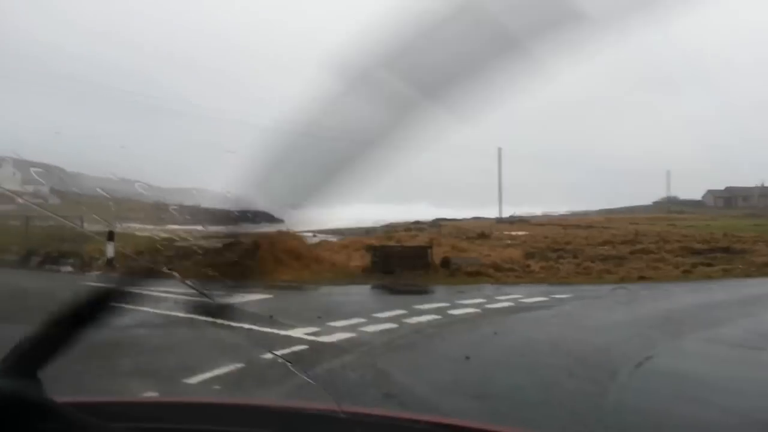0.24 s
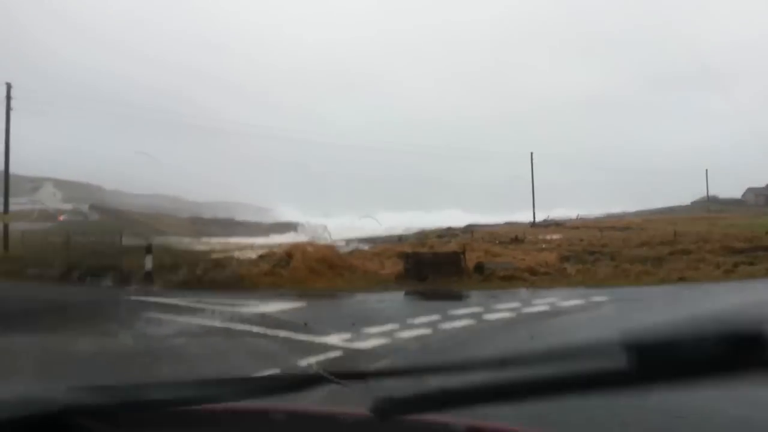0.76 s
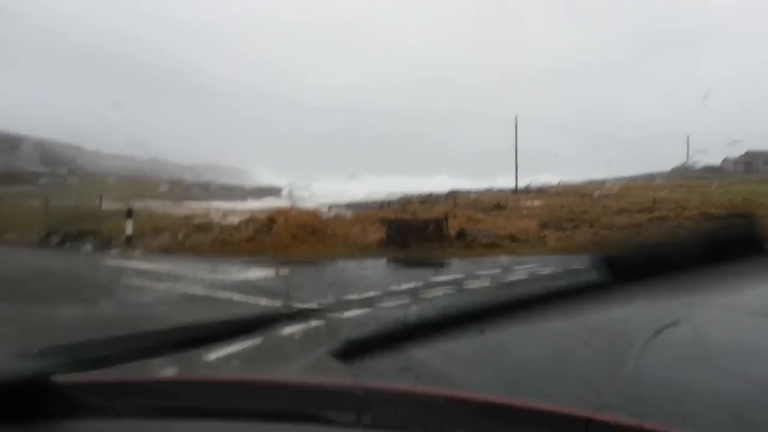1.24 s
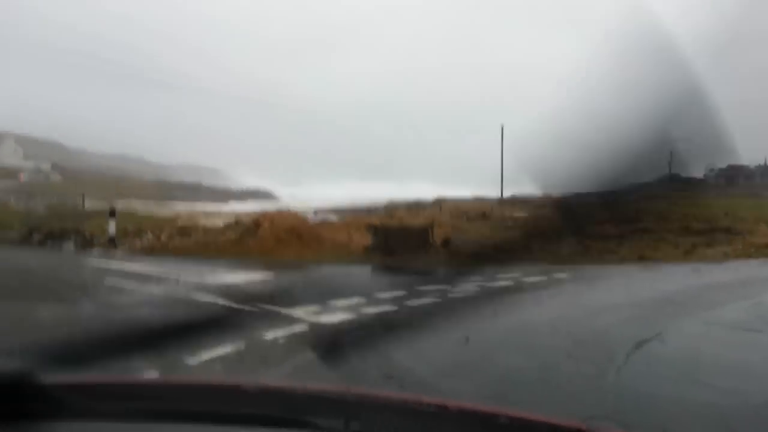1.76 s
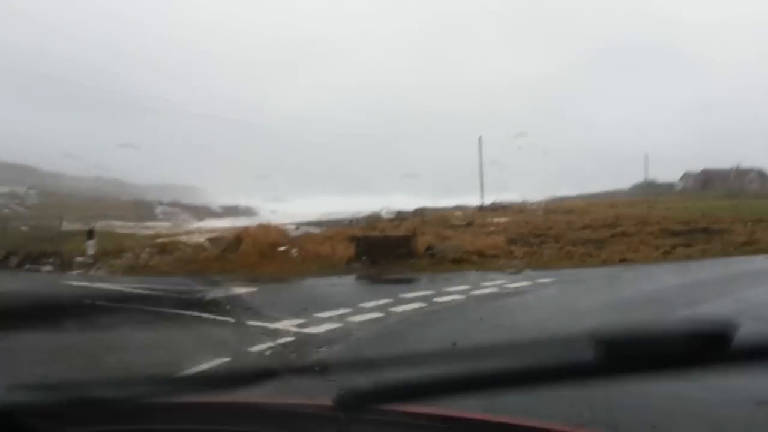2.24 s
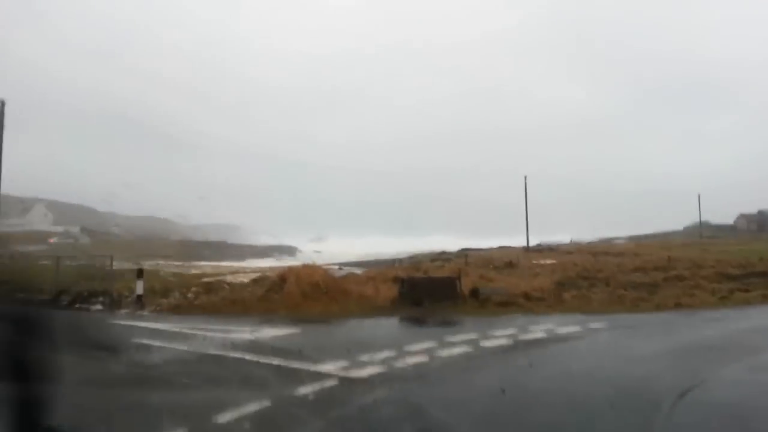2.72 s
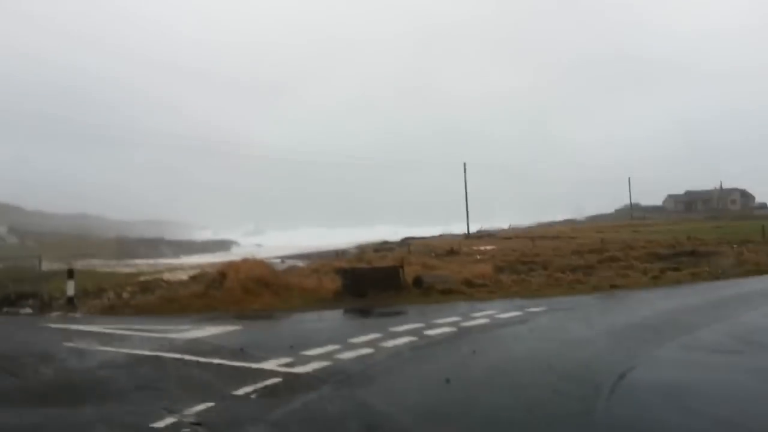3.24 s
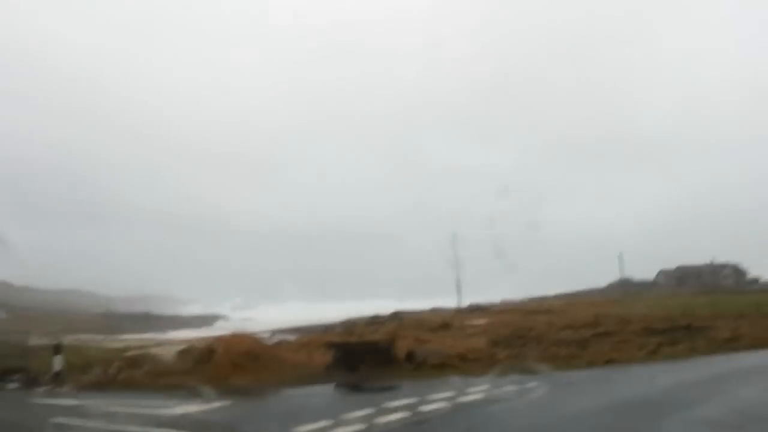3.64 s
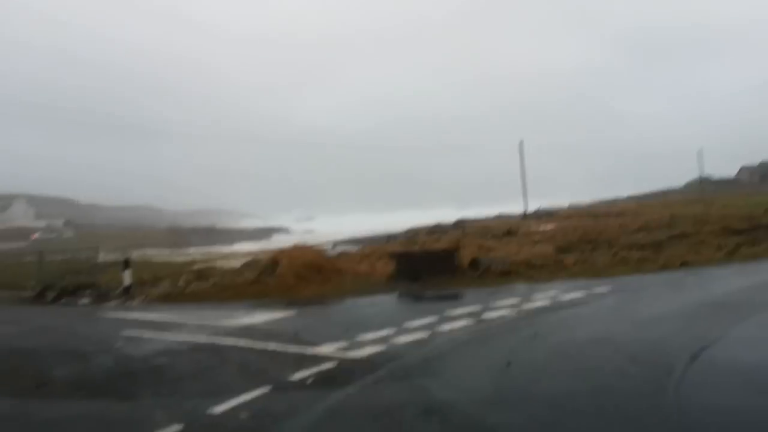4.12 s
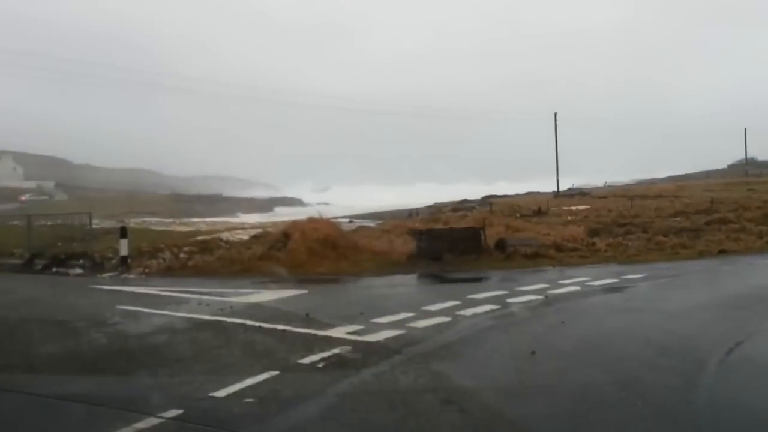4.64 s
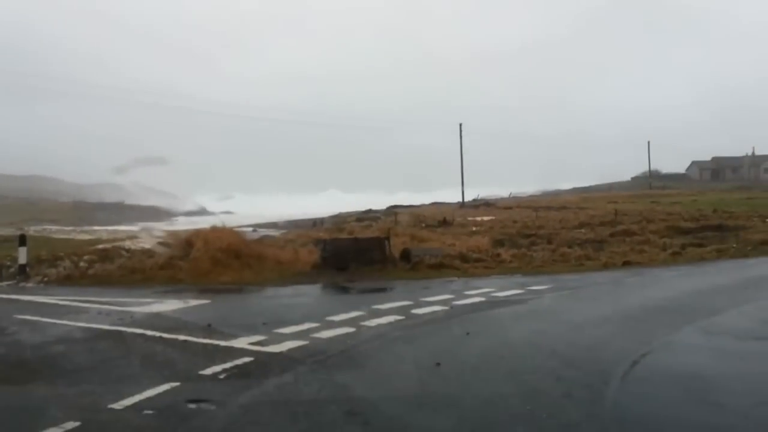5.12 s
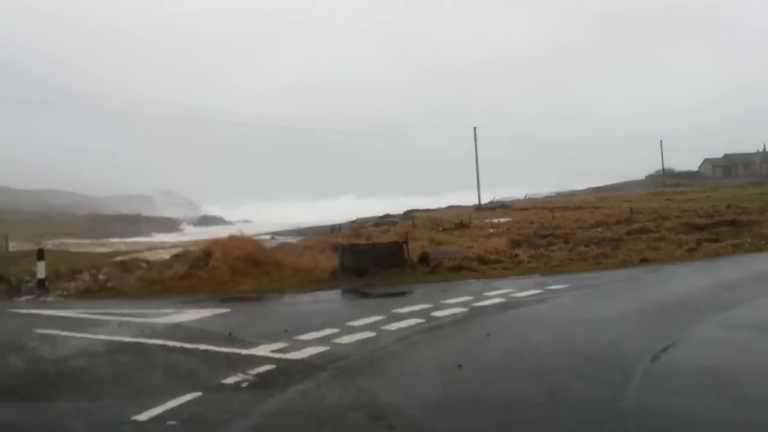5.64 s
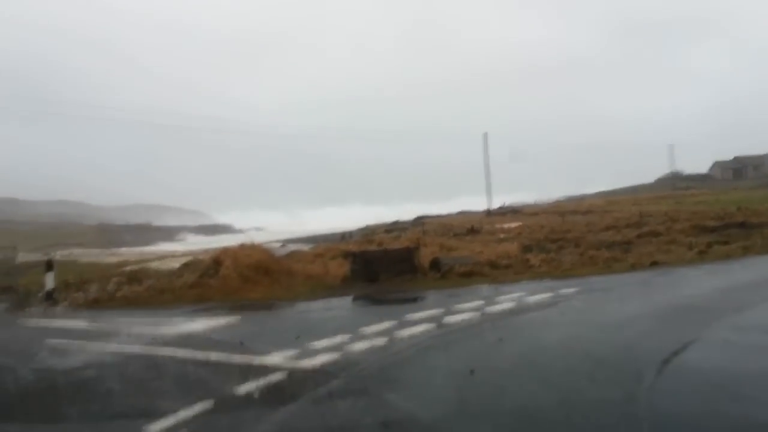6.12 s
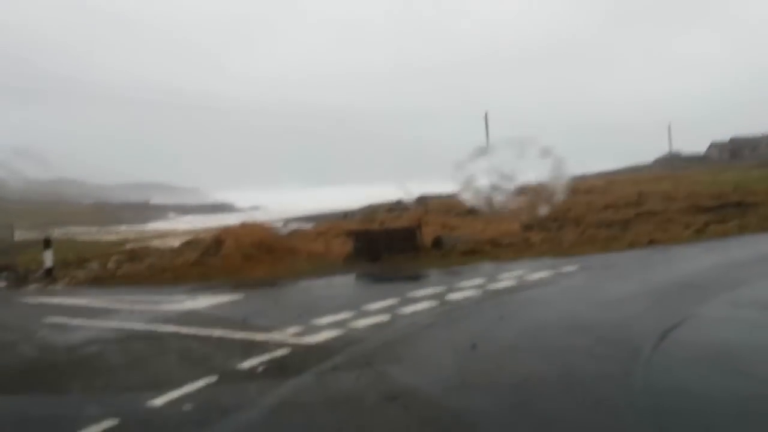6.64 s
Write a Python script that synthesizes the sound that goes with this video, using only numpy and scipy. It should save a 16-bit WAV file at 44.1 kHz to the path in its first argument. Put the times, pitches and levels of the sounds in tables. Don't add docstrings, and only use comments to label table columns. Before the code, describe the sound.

Stereo microphone in a car cabin near the glass: after brief silence, rain rattles quickly over a steady muffled gale, with one hard drop snapping on the right. The wind grows, then a draught buffets the right channel with rapid low puffs and overloaded knocks, while the left stays mostly boom and rain. Treble is slightly ragged and thinned.

```python
import sys
import numpy as np
from scipy import signal
from scipy.io import wavfile
from scipy.ndimage import uniform_filter1d

SR = 44100
rng = np.random.default_rng(int(sys.argv[2]) if len(sys.argv) > 2 else 0)


def boost(x):
    u = np.asarray(x, float) / 20
    return 10 ** u


def pcm_store(signal):
    levels = np.round(np.clip(np.atleast_2d(signal), -1, 1) * 32767)
    wavfile.write(sys.argv[1], SR, levels.astype(np.int16).T)


N = 302967
CALM_DB = -24.0

# time_s, level_db
GALE = [(0.25, -24.5), (0.7, -24), (1.6, -23), (2.2, -22.5), (2.7, -20.5), (3.6, -20), (4.3, -20.5),
        (5.1, -21), (5.7, -20), (6.0, -20.5), (6.4, -19.5), (6.87, -21)]
# peak_s, rain_swell_db, boom_swell_db, thinning_s
GUSTS = [(0.34, 1.5, 1.5, 0.47), (0.5, 2, 0.5, 0.16), (0.66, 5.5, 2.5, 0.093), (0.994, 8, 4.5, 0.058),
         (1.13, 3, 0, 0.15), (1.35, 4, 6.5, 0.11), (1.72, 6, 3, 0.052), (2.011, 5, 4.5, 0.27),
         (2.34, 3.5, 4.5, 0.081), (2.49, 0, 0, 0.052), (2.65, 6.5, 2, 0.2), (2.85, 4, 1.5, 0.33),
         (3.05, 1.5, 1.5, 0.17), (3.22, 1, 1.5, 0.047), (3.38, 2, 1, 0.088), (3.62, 1.5, -1.5, 0.3),
         (3.691, 5.5, -2.5, 0.094), (3.74, 2.5, 1.5, 0.094), (3.785, 1, 3, 0.041), (3.9, 3.5, -0.5, 0.27),
         (4.13, 2.5, 3, 0.2), (4.45, 4, 3, 0.33), (4.722, 2.5, 2.5, 0.028), (4.88, 4.5, -1, 0.28),
         (5.08, 4, -1, 0.053), (5.17, 3.5, 5, 0.17), (5.648, 4, 2, 0.094), (5.81, 5.5, 0, 0.016),
         (6.081, 3.5, -1.5, 0.069), (6.2, 3, 1.5, 0.56), (6.51, 3, 0, 0.075), (6.74, 2, 5.5, 0.1)]
# freq_hz, level_db (per Hz)
BOOM_COLOUR = [(15, -77), (25, -64), (54, -25), (135, -6.5), (211, 0.5), (358, -4), (389, -4.5), (437, -3),
               (559, -4), (628, -7), (1300, -13.5), (1690, -66), (2860, -120)]
# pitch_hz, width_hz, level_db (over the broad boom)
CABIN_RESONANCES = [(297, 31, -1), (345, 32, -5.5), (453, 48, -7.5), (632, 22, 2.5), (689, 36, -5),
                    (857, 170, -6.5), (1143, 29, 0), (1460, 78, 1.5)]
# freq_hz, level_db (per Hz)
PATTER_COLOUR = [(590, -12.5), (1000, -6.5), (1160, -5), (1270, -7), (1460, 17.5), (1810, -5), (2390, 6.5),
                 (2790, 1), (4300, -2.5), (5500, -14.5), (7150, -74), (12100, -120)]
# freq_hz, level_db (per Hz)
SPRAY_COLOUR = [(4500, 16), (5500, 4), (7000, 11.5), (9000, 4), (11000, 2), (13000, 3), (15500, -18.5)]
# freq_hz, likeness (-1 opposed, 0 unrelated, 1 same)
LIKENESS = [(60, 0.94), (110, 0.93), (200, 0.98), (380, 0.57), (700, 0.67), (1290, -0.71), (2380, 0.16),
            (4400, -0.056), (8120, 0.036), (15000, 0.031)]
# start_s, peak_db, pitch_hz, port (0 left, 1 right)
GLASS_SNAPS = [
    (.6386, .3, 4200, 1),
    (1.3858, -11, 4500, 1),
    (2.6565, -11, 5500, 0),
]
# start_s, peak_db, pitch_hz, left_minus_right_db, splash_db
BIG_DROPS = [(0.6497, -22, 2550, -5, 23.5), (0.9562, -18, 2320, -3, -2), (0.9867, -21, 2430, 0, 11),
             (1.4097, -19.5, 4440, 1, 12), (1.719, -22, 2950, 1, 5), (1.914, -19, 2400, -2, 8),
             (2.01, -15, 2500, 11, -10), (2.2245, -26.5, 2540, 11, 17), (2.4882, -16, 2580, -5, -14),
             (2.5925, -25, 2200, 3, 17), (2.656, -14, 2550, 1, 12), (2.7043, -25, 2570, 20, 4),
             (2.745, -17.5, 3000, -2, 11.5), (3.0, -14.5, 3000, -2, 6), (3.056, -11, 2310, 0, -4),
             (3.157, -14, 2660, -2, 8), (3.795, -19, 2600, 2, 15), (3.3812, -16, 2420, -4, -10),
             (3.8826, -17, 2780, 1, -10), (3.918, -24, 2440, -3, 7), (4.113, -10, 2420, -2.5, 0),
             (4.4402, -22, 2510, -22, -8), (4.7311, -14, 2520, 3, 8), (4.878, -17, 2830, 3, 5),
             (4.9052, -17, 2760, 2, 3), (5.162, -8.5, 2520, -6, -21), (5.3668, -17, 2670, -6, -15),
             (6.2133, -10, 2310, -2.0, -23.5), (6.5081, -15, 2720, -5, -11)]
# time_s, level_db
DRAUGHT = [(2.3, -32), (2.6, -10), (3.1, -14.5), (3.5, -12.5), (3.72, -12), (4.05, -19.5), (4.26, -5.5),
           (4.37, -24), (4.46, -9.5), (4.72, -14), (4.95, -9.5), (5.25, -13.5), (5.5, -11.5), (5.7, -16),
           (5.88, -12.5), (6.03, -16.5), (6.25, -14.5), (6.8, -14)]
# freq_hz, level_db (per Hz)
DRAUGHT_COLOUR = [(25, -67), (60, -29), (120, -7), (220, -3.5), (350, -10.5), (600, -9), (900, -48),
                  (1500, -17.5)]
# centre_s, level_db, length_s, pitch_hz
PUFFS = [(2.726, -7, 0.011, 374), (2.797, 3.5, 0.0088, 374), (2.959, 0, 0.009, 327),
         (3.063, -4, 0.011, 318), (3.296, -0.5, 0.019, 286), (3.324, -2, 0.012, 390),
         (3.478, 0.5, 0.012, 420), (3.835, -4, 0.0098, 426), (3.884, -4.5, 0.028, 404),
         (4.011, -4.5, 0.035, 370), (4.089, -9, 0.024, 455), (4.186, -1, 0.0054, 487),
         (4.517, -4.5, 0.016, 405), (4.585, -9, 0.015, 298), (4.843, -7, 0.033, 370),
         (4.95, -6, 0.029, 326), (5.249, -5.5, 0.038, 280), (5.275, -8, 0.0099, 350),
         (5.416, -7.5, 0.014, 297), (4.071, -6, 0.016, 397), (5.812, 0.5, 0.011, 540),
         (5.801, -7.5, 0.011, 600), (5.897, -4, 0.0094, 300), (6.239, -5, 0.0057, 328),
         (3.296, -6.5, 0.0043, 510), (6.131, 4.5, 0.016, 289), (6.141, 3, 0.0065, 426),
         (6.419, -3.5, 0.018, 380), (6.459, -5, 0.013, 350)]
# swing_back_s, peak_db, pitch_hz
KNOCKS = [(2.6881, -1.2, 270), (2.742, 2, 318), (2.7847, 3, 326), (2.8158, -3, 242), (2.9425, 1, 264),
          (3.0145, 1, 270), (3.1475, -1, 292), (3.1618, -4, 325), (3.2056, -5, 264), (3.335, -6, 320),
          (3.4043, -2, 267), (3.4448, -1.5, 320), (3.4972, 4, 240), (3.5202, -1, 242), (3.5472, 3, 322),
          (3.5808, 1.5, 427), (3.5972, -2, 294), (3.6118, 0.5, 242), (3.623, 1.5, 288), (3.6368, -1, 270),
          (3.7953, -2.5, 198), (3.8602, -10, 222), (3.967, -9, 200), (4.0428, 1, 290), (4.169, -15, 242),
          (4.2262, -3, 414), (4.2545, -4, 202), (4.2724, 0, 476), (4.429, -3, 267), (4.4607, -1, 390),
          (4.546, -5.4, 356), (4.6147, -4, 320), (4.8624, -6, 243), (4.9221, -2, 294), (4.9818, -2.5, 220),
          (5.1145, -1, 390), (5.131, -2, 382), (5.192, -2.5, 198), (5.2035, 0, 240), (5.2252, -5, 202),
          (5.395, -2, 194), (5.4314, -1, 380), (5.4695, 3, 545), (5.4813, -0.5, 537), (5.5067, 0, 244),
          (5.5307, 4, 297), (5.548, -3, 240), (5.5624, -1, 300), (5.8291, 2.5, 360), (5.8921, -9, 265),
          (5.907, 0, 318), (5.934, 5.5, 312), (6.149, -5, 296), (6.2332, -2.5, 294), (6.2509, -2, 267),
          (6.3705, -2, 298), (6.3976, -6, 200), (6.6512, 0, 242), (6.7191, 0.5, 286), (6.7475, -5, 392)]
# swing_back_s, peak_db, pitch_hz
MORE_KNOCKS = [(2.826, -4, 380), (2.973, -5, 380), (2.995, -6, 360), (3.191, -7, 325), (3.323, -6, 410),
               (3.487, 0, 420), (3.513, -6, 300), (3.731, -7.5, 540), (4.068, -1, 410), (4.089, -7, 480),
               (4.098, -7, 490), (4.183, 2, 520), (4.436, -11, 320), (4.516, 3, 406), (4.585, 3, 300),
               (4.6, -5, 340), (4.627, -2, 373), (4.643, -7, 375), (4.821, -2, 360), (4.844, 3, 414),
               (4.958, -3, 300), (4.965, -2, 490), (5.119, -5, 403), (5.186, -5, 405), (5.25, -3, 290),
               (5.27, -1, 337), (5.2775, -6, 453), (5.412, -2, 358), (5.455, -3, 370), (5.806, 5, 650),
               (5.821, -4, 560), (5.895, -9, 360), (5.915, -3, 400), (6.094, -2.5, 395), (6.139, 3, 600),
               (6.162, -8, 395), (6.26, -5, 295), (6.457, 1, 380), (6.64, -6, 402), (6.775, -12, 358),
               (2.585, -2, 600), (3.29, 3, 523), (3.475, 6, 520), (3.544, -13, 600), (6.492, -4, 560),
               (6.705, -10, 560)]
# start_s, length_s, ceiling_lift_hz (dies away after)
OPEN_TREBLE = [(.33, 0, 900), (.38, 0, 1100), (.48, 0, 900), (1.06, 0, 700), (2.0, 0, 900), (2.08, 0, 1200),
               (2.28, 0, 1800), (2.4, 0, 900), (0.635, .05, 0), (1.38, .04, 500), (1.895, .035, 300),
               (2.58, .03, 2), (2.64, .04, 500), (2.775, .065, 2000), (3.265, .035, -2), (3.61, .07, 2000),
               (4.836, .06, 2000), (5.91, .02, 11), (6.345, .024, 0), (6.5, 0, 1198)]


def rms_one(x):
    return x / np.sqrt(np.mean(x ** 2) + 1e-20)


def in_time(rows):
    s, *columns = np.transpose(rows)
    return [np.interp(np.arange(N) / SR, s, c) for c in columns]


def at_hz(points, hz):
    freq_hz, value = np.transpose(points)
    return np.interp(np.log(hz), np.log(freq_hz), value)


def drift(rate):
    r = np.exp(-80 * np.pi * rate / SR)
    slow = signal.lfilter([1], [1, -2 * r, r * r], rng.standard_normal(N // 40 + 2002))[2000:]
    return np.interp(np.arange(N) / 40, np.arange(len(slow)), rms_one(slow - slow.mean()))


def band(x, low_hz, high_hz):
    return signal.sosfilt(signal.butter(2, [low_hz, high_hz], "band", fs=SR, output="sos"), x)


def white():
    return rng.standard_normal((2, 2, N))


def colour(source, spectrum, shared_db, own_db, rate):
    first, last = spectrum[0][0], spectrum[-1][0]
    edges = np.geomspace(first, last, round(3 * np.log2(last / first)) + 1)
    out, together = 0, drift(rate)
    for k, (low, high) in enumerate(zip(edges, edges[1:])):
        hz = np.sqrt(low * high)
        band_db = at_hz(spectrum, hz)
        if band_db < -62:
            continue
        mid, side = band(source[k % 2], low, high)
        alike = np.clip(at_hz(LIKENESS, hz), -1, 1)
        gain = boost(band_db + shared_db * together + own_db * drift(rate))
        stereo = np.sqrt(1 + alike) * mid + np.sqrt(1 - alike) * side * [[1], [-1]]
        out = out + gain * stereo
    return rms_one(out)


def gale():
    return in_time(GALE)[0] - CALM_DB


def swells(times, sizes_db, rise_s, fall_s):
    t = np.arange(0, N + 64, 64) / SR
    late = t - np.array(times)[:, None]
    shape = np.exp(np.where(late < 0, late / rise_s, -late / fall_s))
    return np.interp(np.arange(N) / SR, t, np.array(sizes_db) @ shape)


def boom():
    s, _, size_db, _ = np.transpose(GUSTS)
    level_db = CALM_DB + gale() + swells(s, size_db, rise_s=0.04, fall_s=0.1)
    broad = colour(white(), BOOM_COLOUR, shared_db=-0.07, own_db=2.0, rate=26.7)
    ringing = 0
    for hz, width_hz, db in CABIN_RESONANCES:
        gain = boost(db + 3.3 * drift(1.65))
        ringing = ringing + gain * signal.lfilter(*signal.iirpeak(hz, hz / width_hz, SR), broad)
    return boost(level_db) * rms_one(broad + ringing)


def impacts(per_s, spread_db, wash):
    sizes = boost(spread_db * np.minimum(rng.exponential(1, (2, N)), 5)) * rng.choice([-1, 1], (2, N))
    landed = rng.random((2, N)) < per_s / SR
    return rms_one(sizes * landed) + wash * white()


def rain():
    s, size_db, _, thin_s = np.transpose(GUSTS)
    sheet_db = swells(s, size_db, rise_s=0.015, fall_s=thin_s[:, None])
    wind_db = np.maximum(gale(), 0)
    patter_db = -33 + 0.49 * wind_db + sheet_db
    spray_db = -16 - 0.19 * wind_db - 0.023 * sheet_db
    pan_db = -3.5 + 0.4 * wind_db
    drops = impacts(per_s=1500, spread_db=6.5, wash=4.5)
    patter = boost(3.0) * colour(drops, PATTER_COLOUR, shared_db=1.0, own_db=0.7, rate=53)
    patter = patter + 0.33 * band(patter, 4910, 5480)
    tick = 0.24 * np.clip(1 - wind_db / 3, -.5, 1) * band(patter, 3550, 7300)
    windscreen = 0.024 * sheet_db * band(patter, 2170, 3500)
    patter = patter + tick + windscreen
    spray = boost(spray_db + 4.5) * colour(drops, SPRAY_COLOUR, shared_db=-0.4, own_db=1.74, rate=58)
    return boost(patter_db) * (patter * boost(np.outer([.5, -.5], pan_db)) + spray)


def glass_snaps():
    out, t = np.zeros((2, N)), np.arange(64) / SR
    for s, peak_db, hz, port in GLASS_SNAPS:
        i = round(s * SR)
        snap = -np.cos(2 * np.pi * hz * t) * np.exp(-(t * hz / 1.5) ** 3)
        out[port, i:i + len(t)] += boost(peak_db) * snap
    return out


def big_drops():
    out, t = np.zeros((2, N)), np.arange(round(.12 * SR)) / SR
    noises = rng.standard_normal((len(BIG_DROPS), 2, len(t)))
    for (s, peak_db, hz, pan_db, splash_db), noise in zip(BIG_DROPS, noises):
        tick = np.sin(2 * np.pi * hz * t) * np.exp(-(t * hz / 2.0 - .8) ** 2)
        splash = rms_one(band(noise, 1940, 4800)) * np.exp(-t / 0.0079)
        drop = boost(-1.0) * tick + boost(splash_db - 18.5) * splash
        i = round(s * SR)
        out[:, i:i + len(t)] += boost(peak_db + np.array([[.5], [-.5]]) * pan_db) * drop
    return out


def knocks(rows):
    rise, fall = 0.3, 0.95
    snap = .55
    out, t = np.zeros(N + SR), np.arange(-400, 1200) / SR
    for (s, peak_db, hz), u in zip(rows, rng.uniform(-1.1, 1, (len(rows), 2))):
        turns = t * hz * np.where(t > .5 / hz, 1 + .12 * u[0], 1)
        decay = turns / (fall * (1 + 0.22 * u[1]))
        shape = np.exp(-np.where(t < 0, (turns / rise) ** 2, decay))
        phase = 2 * np.pi * turns
        swing = np.sin(phase + snap * np.sin(phase) * (np.abs(turns) < .5))
        i = round((s + t[0]) * SR)
        out[i:i + len(t)] -= boost(peak_db - 1.0) * swing * shape
    return out[:N]


def port_wind():
    level_db, = in_time([(DRAUGHT[0][0] - .4, -50)] + list(DRAUGHT))
    lumps = impacts(per_s=200, spread_db=3.5, wash=0.4)
    near = colour(lumps, DRAUGHT_COLOUR, shared_db=1.5, own_db=1.5, rate=25)[0]
    far = np.roll(near, N // 2)
    right = boost(level_db - 9.5) * near + knocks(KNOCKS)
    t = np.arange(-round(.06 * SR), round(.06 * SR)) / SR
    for (s, puff_db, length, hz), noise in zip(PUFFS, rng.standard_normal((len(PUFFS), len(t)))):
        swell = np.exp(-np.abs(2 * t / (np.where(t < 0, 1.25, .95) * length)) ** 3)
        eddy = band(band(noise ** 3, 0.58 * hz, 1.287 * hz), 88, 2.47 * hz)
        eddy = eddy / np.sqrt(uniform_filter1d(eddy ** 2, size=420) + 1e-9)
        crest = rms_one(band(band(noise, 600, 1700), 400, 2300))
        crest = crest * np.exp(-((t - 0.18 * length) / 0.0015) ** 2)
        eddy = eddy + boost(-12 + 0.49 * min(puff_db, 0)) * crest
        push = np.sign(noise[0]) * boost(-58 + 2.2 * puff_db)
        gain = boost(puff_db - 3.5 + 0.27 * max(puff_db + 0.5, 0))
        i = round((s + t[0]) * SR)
        right[i:i + len(t)] += (gain * swell * (eddy + push))[:N - i]
    return np.array([boost(level_db - 14.0) * far, right + knocks(MORE_KNOCKS)])


def scene():
    return boom() + rain() + big_drops() + glass_snaps() + port_wind()


def starve_treble(x, slope_hz, ragged_db, hz_per_db):
    hop, lead = 1024, 1160
    n, k = np.arange(2 * hop)[:, None] + .5, np.arange(hop) + .5
    window = np.sqrt(2 / hop) * np.sin(np.pi * n / (2 * hop))
    basis = window * np.cos(np.pi / hop * (n + hop / 2) * k)
    halves = np.pad(x, ((0, 0), (lead, 2 * hop - (N + lead) % hop))).reshape(2, -1, hop)
    lines = np.concatenate([halves[:, :-1], halves[:, 1:]], axis=2) @ basis
    s = ((np.arange(lines.shape[1]) + 1) * hop - lead) / SR
    hz = k * SR / (2 * hop)
    level_db = 10 * np.log10(np.mean(lines ** 2, axis=2) + 1e-12)
    loud_db = uniform_filter1d(np.maximum(level_db.max(axis=0), -30), size=15)
    ceiling = 10200 - 198 * (loud_db + 25.5)
    for start_s, length_s, lift_hz in OPEN_TREBLE:
        ceiling = ceiling + lift_hz * np.exp(-np.abs(s - start_s - length_s) / 0.17) * (s > start_s)
    ceiling = ceiling - hz_per_db * uniform_filter1d(level_db - level_db[::-1], size=11)
    usual = uniform_filter1d(uniform_filter1d(lines ** 2, size=9, axis=1), size=33, axis=2)
    usual = np.sqrt(usual)
    luck = np.repeat(rng.standard_normal((2, len(s), hop // 16)), 16, axis=2)
    over_hz = hz - ceiling[..., None]
    bent_hz = over_hz + .5 * np.minimum(over_hz, 0) + .35 * np.maximum(over_hz - 1500, 0)
    ragged = boost(ragged_db * luck * np.clip(1 + over_hz / 1500, .2, 2))
    gate = usual * np.exp(bent_hz / slope_hz) * ragged
    faint = np.mean((lines / (usual + 1e-12)) ** 2, axis=0) < .18 * (hz / 7600) ** 1.8
    wide_open = np.any([(s > t) & (s < t + length) for t, length, _ in OPEN_TREBLE], axis=0)
    kept = (np.abs(lines) > gate) & ~faint | wide_open[:, None]
    frames = (lines * kept) @ basis.T
    joined = frames[:, 1:, :hop] + frames[:, :-1, hop:]
    return joined.reshape(2, -1)[:, lead - hop:][:, :N]


def top_cut(x):
    return signal.sosfilt(signal.butter(12, 15890, fs=SR, output="sos"), x)


def record(dry):
    start_s, fade_s = 0.239, 0.05
    fade = np.clip((np.arange(N) / SR - start_s) / fade_s, 0, 1) ** 0.8
    x = np.clip(fade * dry, -1.01, 1.01)
    x = signal.sosfilt(signal.cheby2(14, 60, 15300, fs=SR, output="sos"), x)
    x = starve_treble(x, slope_hz=3100, ragged_db=1.0, hz_per_db=126)
    return top_cut(x)


dry = scene()
out = record(dry)
pcm_store(out)
```